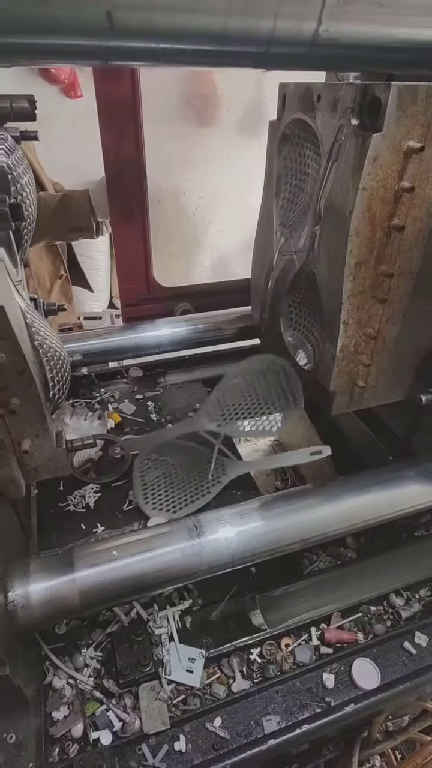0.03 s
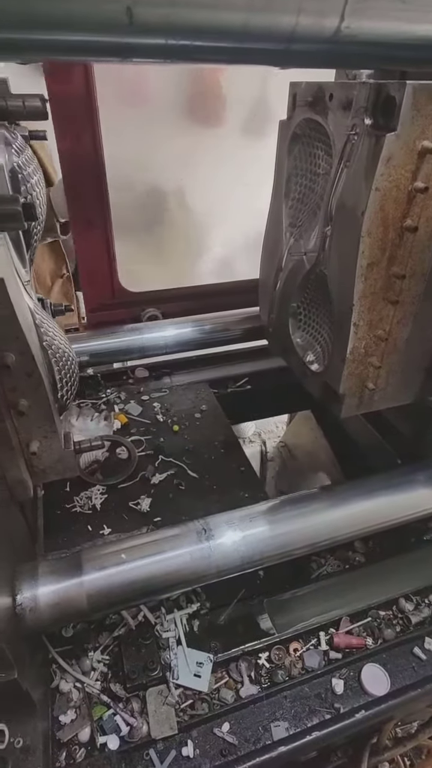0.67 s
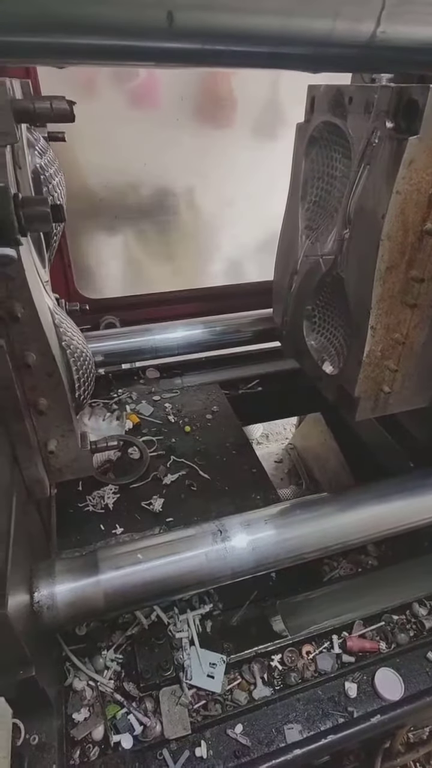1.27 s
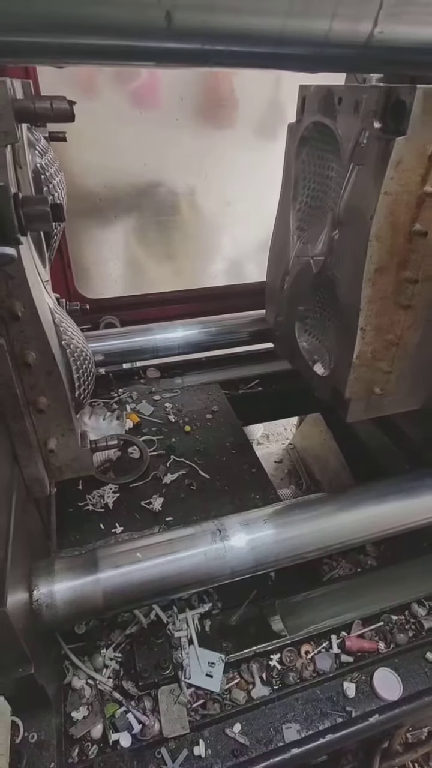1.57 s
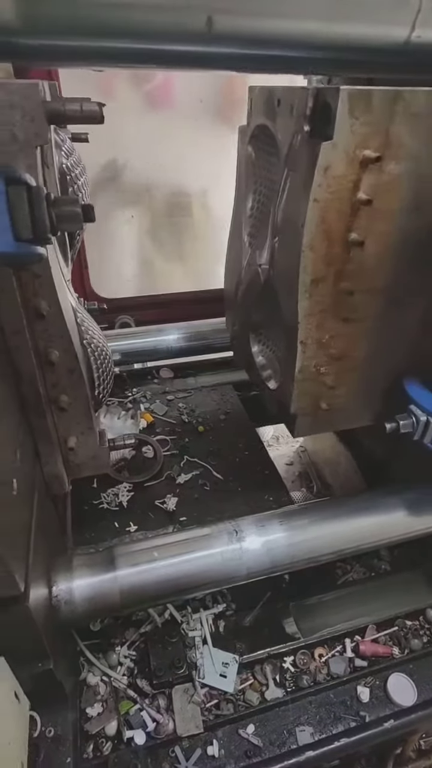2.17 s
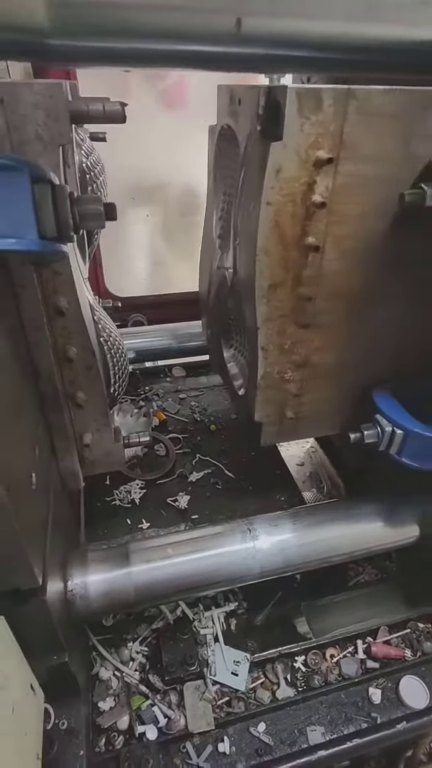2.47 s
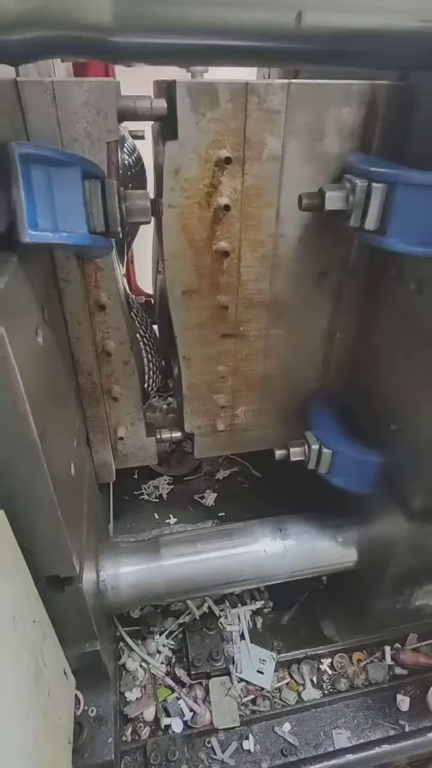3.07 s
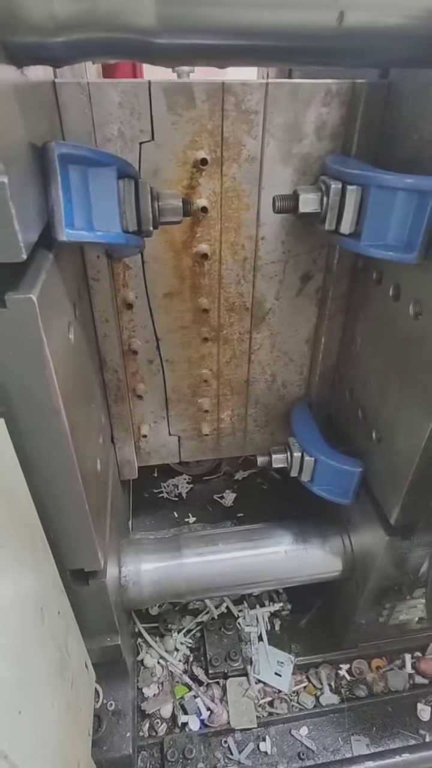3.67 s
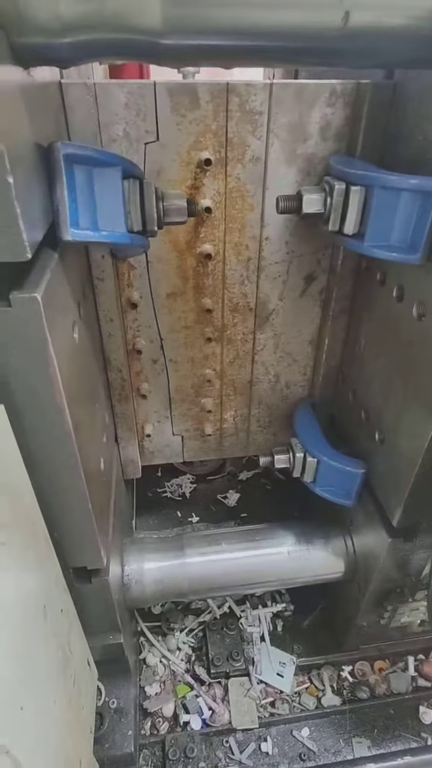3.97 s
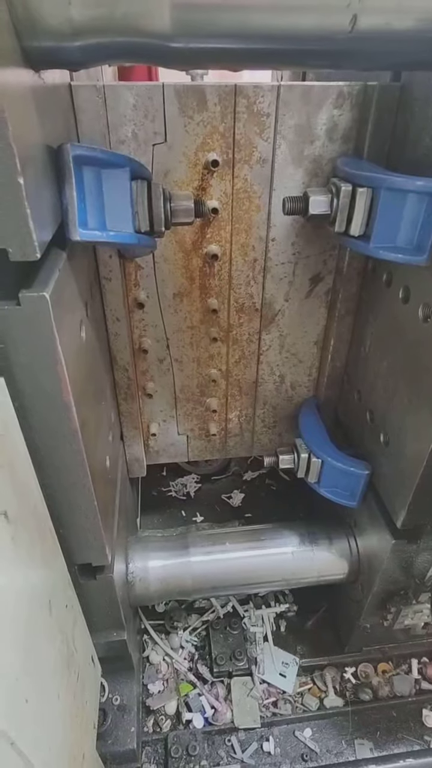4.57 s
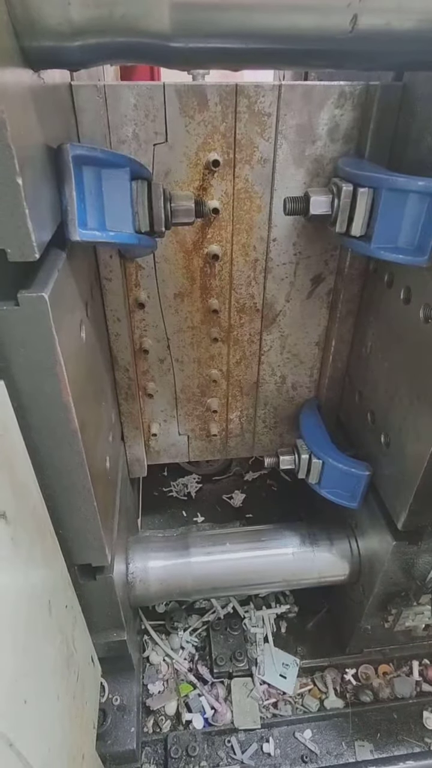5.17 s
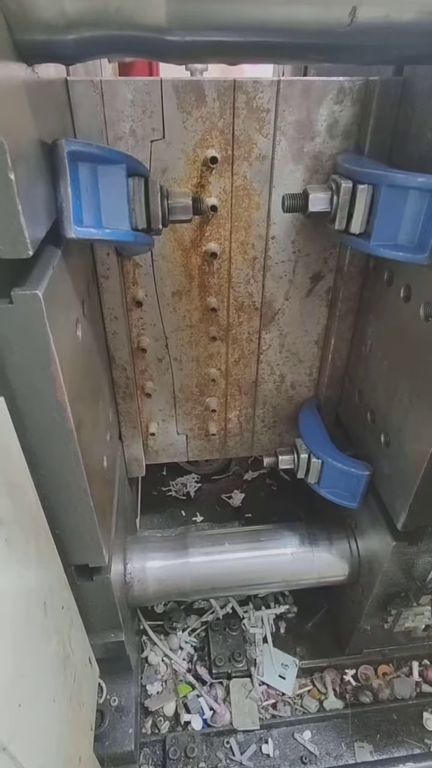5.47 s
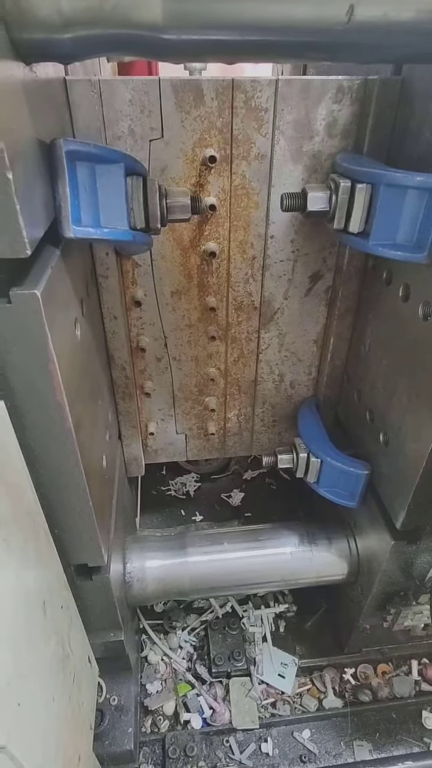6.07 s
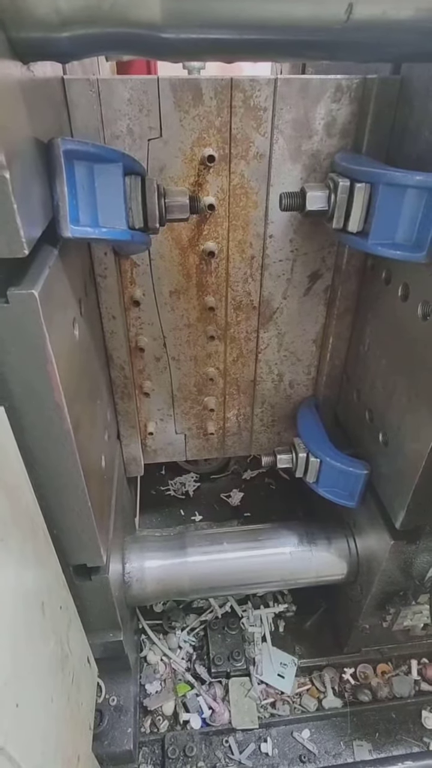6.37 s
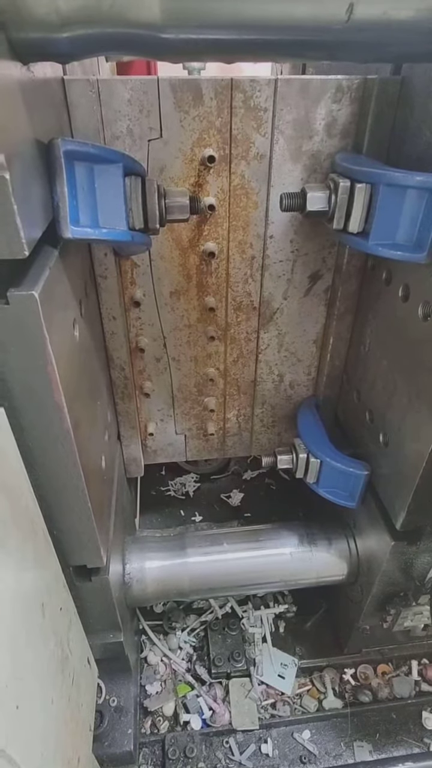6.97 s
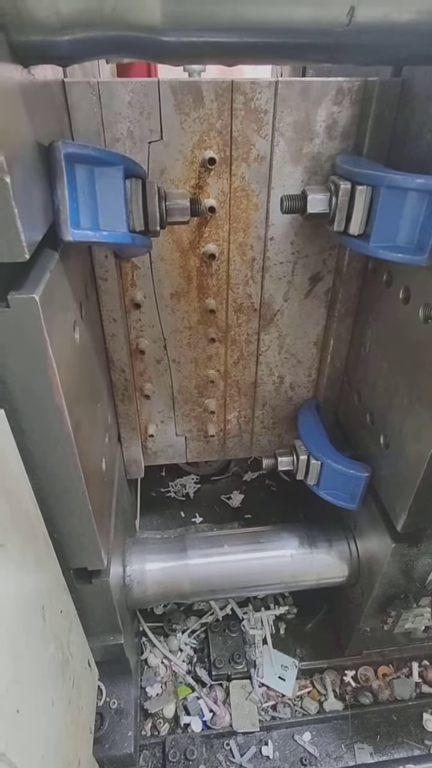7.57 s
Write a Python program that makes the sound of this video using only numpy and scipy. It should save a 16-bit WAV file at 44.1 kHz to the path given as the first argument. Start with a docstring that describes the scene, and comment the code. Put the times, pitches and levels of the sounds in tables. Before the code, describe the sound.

For the first 1.6 seconds, plastic parts clatter down the steel chute of an injection moulding machine in quick, uneven, ringing knocks, with low bumps as the ejector rocks the machine. From about 1.7 seconds a hydraulic pump hums under load, oil rushes and the steel mould scrapes softly as it slides shut. Small jolts and short hisses come between 3.3 and 3.9 seconds, then the mould locks with a heavy metallic clunk at 4.3 seconds. The pump briefly eases, and at 5 seconds a valve spits sharply with a thud. The pump returns higher, drops to a steady buzzing drone over rushing oil, and sinks in pitch from about 7 seconds to the end near 8. Short gritty scrapes come between 5.7 and 7.3 seconds. Throughout, heard from beside the mould, the motor drive whines thinly and other machines hum in the factory hall.

```python
"""One cycle of an injection moulding machine in a factory. First, ejected plastic parts clatter down
the steel chute and the ejector rocks the frame. The hydraulic pump takes up load as the mould scrapes
shut, then locks with a heavy clunk at 4.3 s. A valve spits sharply at 5 s, and the pump's pistons
drone through the injection over rushing oil, slowing as the mould fills. All the while the motor
drive whines thinly and other machines hum in the hall."""
import sys
import numpy as np
from scipy import signal
from scipy.fft import rfft, irfft, next_fast_len
from scipy.io import wavfile
from scipy.ndimage import uniform_filter1d, minimum_filter1d, map_coordinates

SR = 44100
rng = np.random.default_rng(int(sys.argv[2]) if len(sys.argv) > 2 else 0)


def output_pcm(signal):
    """Save a mono or channel-first signal as 16-bit PCM at the path in sys.argv[1].

    Samples are clipped to [-1, 1] before scaling.
    """
    pcm = np.clip(np.atleast_2d(signal).T, -1, 1) * 32767
    wavfile.write(sys.argv[1], SR, np.round(pcm).astype(np.int16))


N = 344421

# Hits on the chute: (time [s], level [dB], hardness [dB/octave], thud [dB], ring length [factor],
# body modes [dB], low note [Hz], low note level [dB], high note [Hz], high note level [dB])
CHUTE_HITS = [(.003, -27.5, 0, -25, 0.52, 5, 436, -16, 1110, -29),
              (.019, -27, 1.5, -24, 0.69, -24, 360, -32, 2380, -21.5),
              (.054, -38, -4, -20.5, 0.8, -15, 242, -15.5, 613, -24),
              (.160, -32, 1, -45, 0.5, -20, 654, -24, 1970, -20),
              (.167, -27.5, -0.5, -42, 0.74, 7, 321, -17, 823, -21),
              (.19, -26, 0, -50, 1.21, 8.5, 620, -25, 2317, -24),
              (.248, -44, 4, -55, .4, -20, 820, -33, 4000, -33),
              (.376, -33.5, -1.5, -38, 0.64, -4, 720.5, -18, 1245, -17),
              (.395, -38, -0.5, -40, 1.83, -15, 722, -20, 1296, -24),
              (.528, -28, 4, -25.5, 0.57, -5, 1215, -21, 2380, -26),
              (.55, -35.5, -1.5, -32, 1.07, -8, 544, -23.5, 2525, -29),
              (.773, -30, -2, -31.5, 0.65, -10, 350, -15.5, 2070, -22),
              (.907, -32.5, 0.5, -27.5, 1.02, -2, 378, -20, 1050, -35),
              (.959, -28.5, 3, -49, 0.75, -13, 338, -15, 1853, -15),
              (.977, -33, 1, -42, 1.5, -3, 1780, -23, 2280, -19.5),
              (1.042, -42, -2, -34, 0.36, -2, 358, -10, 2230, -29),
              (1.07, -34, 4, -29, 0.62, -10, 1000, -22, 2300, -32),
              (1.099, -26, 1.5, -23, 0.62, -22, 367, -16, 2320, -26),
              (1.137, -36.5, -5.5, -25, 0.94, -4, 204, -18.5, 694, -27),
              (1.184, -25, -0.5, -26, 0.98, 1, 2044, -20, 3650, -22),
              (1.241, -35.5, 1.5, -45, .45, -17, 344, -10, 1990, -18),
              (1.252, -25, -1.5, -37, 1.13, 9, 331, -14.5, 834, -20),
              (1.284, -27.5, 1, -49, 1.09, 4.5, 973, -22, 3100, -23),
              (1.311, -35, 5.5, -23.5, 0.69, -1, 327, -17, 6600, -30),
              (1.408, -30.5, -1, -29, 1.25, -13, 790, -30, 1850, -31),
              (1.456, -31, -1.5, -22.5, 1.3, -4.5, 720, -21, 1256, -19),
              (1.573, -37, -2.5, -25, 1.32, -18, 514, -26, 2924, -28.5)]
# The chute's steel ring: (frequency [Hz], level [dB], t60 [s])
CHUTE_MODES = [(316.2, 6, 0.34), (416, -17, 0.52), (622, -6.5, 0.18), (750, -21, 0.4), (809, -6, 0.53),
               (957, -8.5, 0.47), (1310, -12, 0.22), (1910, -15, 0.11), (2060, -25, 0.49),
               (2310, -21, 0.37), (3090, -14, 0.22), (3700, -28, 0.3), (4640, -19, 0.24)]
# Dense vibration between those modes: (frequency [Hz], noise density [dB])
CHUTE_WASH = [(60, -9), (250, -7.5), (330, 0), (600, -5.5), (1300, -11), (1500, -19.5), (1900, -12.5),
              (2350, -13.5), (2700, -19), (3700, -22.5), (5200, -29), (7500, -25.5), (9000, -42),
              (12000, -39)]
# EQ of an average hit, above the thud: (body [dB], ring [dB], clack [dB], crack [dB])
CHUTE_EQ = [7, 3.5, 3, -6.5]


def chute():
    """Plastic parts and the ejector knock on the steel chute."""
    return amp(-4.0) * blows(CHUTE_HITS, CHUTE_MODES, CHUTE_WASH, CHUTE_EQ, ripple_db=8, focus_db=6,
                             wash_db=5.5, wash_t60=0.62, snap_db=3.5, snap_t60=0.068,
                             overtone_db=-9.5, low_t60=0.3, high_t60=0.24)


# Jolts as the clamp sets off, meets and locks: (time [s], level [dB], hardness [dB/octave], thud [dB],
# ring length [factor], body modes [dB], low note [Hz], its level [dB], high note [Hz], its level [dB])
CLAMP_HITS = [(3.328, -49, 2, -28, 0.66, -14, 121, -22, 305, -35),
              (3.535, -45, 0.5, -40, 0.8, 0, 653, -28, 747, -30.5),
              (3.881, -35, -0.5, -23, 0.69, -2, 312, -20.5, 1824, -29.5),
              (4.335, -28.5, -4, -39, 0.98, -4, 389.4, -6.5, 1995, -40),
              (4.371, -30.5, 0.5, -44, 1.0, 3, 336, -16, 452, -30),
              (4.409, -39, -1.5, -28.5, 0.64, -2, 225, -32, 470, -19),
              (4.478, -57, 3, -28, 0.9, -12, 73, -22, 380, -38),
              (4.801, -43, 4.5, -32, 0.95, 1, 194.7, -20.5, 304, -32.5),
              (5.009, -34.5, 2, -25, 1.09, -4, 92.5, -24, 192, -34)]
# The clamp's ring: (frequency [Hz], level [dB], t60 [s])
CLAMP_MODES = [(225, -2.5, 0.68), (311, -12, 0.55), (366, -1, 0.22), (399, -11, 0.32), (447, -4, 0.31),
               (604, -14, 0.36), (798, -9, 0.4), (1030, -29, 0.41), (1373, -20, 0.9), (1830, -12, 0.6),
               (1981, -2.5, 0.91), (2223, -4.5, 0.49)]
# Dark vibration between those modes: (frequency [Hz], noise density [dB])
CLAMP_WASH = [(40, 7.5), (85, 1.5), (150, -6.5), (230, -3), (460, -3), (560, -9.5), (1500, -26.5),
              (2000, -10), (2900, -22.5), (12000, -61)]
# EQ of an average jolt, above the thud: (body [dB], ring [dB], clack [dB], crack [dB])
CLAMP_EQ = [7.5, 1.5, -13.5, -11]


def clamp():
    """The heavy platens meet, lock and shudder as they take up the load."""
    shudder = amp(2 * wobble(85))
    clunks = blows(CLAMP_HITS, CLAMP_MODES, CLAMP_WASH, CLAMP_EQ, ripple_db=3, focus_db=2.5,
                   wash_db=6.0, wash_t60=0.67, snap_db=2, snap_t60=0.11,
                   overtone_db=-30, low_t60=0.23, high_t60=0.26)
    return amp(-2.0) * shudder * clunks


# A hit's thud, body, ring, clack and crack bands: (low edge [Hz], high edge [Hz])
HIT_BANDS = [(65, 200), (200, 650), (650, 1500), (1500, 3000), (3000, 14000)]


def blows(hits, modes, wash, eq_db, ripple_db, focus_db, wash_db, wash_t60, snap_db, snap_t60,
          overtone_db, low_t60, high_t60):
    """Each blow rings a body: hard contact is brighter, weight adds thud, the striker adds two notes."""
    out = np.zeros(N + SR)
    t = np.arange(SR * 3 // 4) / SR
    filters = [signal.butter(3, band, "bandpass", fs=SR, output="sos") for band in HIT_BANDS]
    low_edge, high_edge = np.transpose(HIT_BANDS[1:])
    octaves = np.log2(np.sqrt(low_edge * high_edge) / 1300)  # hardness tilts the EQ about 1300 Hz
    mode_hz, mode_db, mode_t60 = np.transpose(modes)[:, :, None]
    for start, db, hardness, thud_db, length, ring_db, low_hz, low_db, high_hz, high_db in hits:
        hit = out[round(start * SR):][:len(t)]
        age = t / length
        # the striker's hollow notes: the high one is a beating cluster under weak overtones
        notes = [(low_hz, low_db, low_t60)]
        notes += [(high_hz * (1 + detune), high_db - 6, high_t60) for detune in rng.normal(0, 0.0172, 3)]
        notes += [(high_hz * ratio, high_db + overtone_db - 9 * np.log2(ratio), high_t60 / np.sqrt(ratio))
                  for ratio in rng.uniform(1, 2.1, 4)]
        for hz, note_db, t60 in notes:
            envelope = amp(note_db - 60 * age / t60) * (1 - np.exp(-t / 0.00037))
            hit += envelope * np.sin(2 * np.pi * hz * t)
        shifted_hz = mode_hz * (1 + rng.normal(0, 0.0047, mode_hz.shape))  # load detunes the body
        decay = amp(ring_db + mode_db + rng.normal(0, 3.3, mode_hz.shape) - 60 * age / mode_t60)
        ring = decay * np.sin(2 * np.pi * (shifted_hz * t + rng.random(mode_hz.shape)))
        # a short contact, then vibration that builds up inside the guard and dies away
        snap = amp(snap_db - 60 * t / snap_t60) / length ** 2  # dead blows are mostly contact
        bloom = amp(wash_db - 60 * age / wash_t60) * (1 - np.exp(-age / .005))
        texture = contact_noise(wash, len(t), ripple_db, high_hz, focus_db)
        body = (ring.sum(0) + (snap + bloom) * texture) * (1 - np.exp(-t / 0.00014))
        above_thud_db = db + np.array(eq_db) + hardness * octaves
        for sos, band_db in zip(filters, [thud_db, *above_thud_db]):
            band = signal.sosfilt(sos, body)
            hit += amp(band_db) * band / np.std(band[:SR // 20])  # the first 50 ms set the level
    return out[:N]


def contact_noise(spectrum, size, ripple_db, focus_hz, focus_db):
    """Each point of contact favours its own narrow resonances, most of all around one note."""
    hz = np.fft.rfftfreq(size, 1 / SR)
    ripple = map_coordinates(rng.standard_normal(256), [16 * np.log2(1 + hz / 400)])
    focus = np.exp(-(np.log2((hz + 1) / focus_hz) / 0.12) ** 2)  # a bell, 0.12 octave to each side
    peaks = amp(ripple_db * np.tanh(ripple) + focus_db * focus)
    return unit(irfft(rfft(noise(spectrum, size)) * peaks, size))


# The pump's pitch, which frame and drive also follow: (time [s], piston rate [Hz])
PUMP_SPEED = [(1.9, 140.5), (2.2, 138.3), (3.7, 139), (4.0, 131.8), (4.12, 133.6), (4.25, 149.3),
              (5.0, 201.5), (5.2, 185.4), (5.37, 184.2), (5.46, 158.4), (5.55, 151.8), (5.8, 148.9),
              (6.3, 148.2), (6.7, 147.5), (6.85, 145.6), (7.0, 141), (7.15, 136.5), (7.3, 129.7),
              (7.6, 112.5)]
# Its effort through closing, locking, a pause and injection: (time [s], level re full load [dB])
PUMP_LOAD = [(1.0, -11), (1.75, -3), (2.5, -4.5), (3.6, -4), (4.25, 0), (4.6, -16), (4.95, -18), (5.15, -2),
             (5.7, -0.5), (6.9, 0.5), (7.2, 0.5), (7.81, -7.5)]
# The frame's response to the strokes, a notch between two resonances: (frequency [Hz], gain [dB])
FRAME_RESPONSE = [(112, -7), (128, 0.5), (135, -11), (138, -12), (148, -3.5), (156, -0.5), (168, -16),
                  (200, 0)]
# Pipe resonances that the overtones sweep through: (frequency [Hz], gain [dB])
PIPE_RESPONSE = [(280, -1.5), (435, 4.5), (535, 0), (595, 6), (700, 3), (745, 2), (830, 5.5), (900, 3),
                 (1040, -0.5), (1110, 3.5), (1190, -6.5), (1340, -5.5), (1600, -9), (2100, -13)]
# Fader ride of the oil through the valves: (time [s], flow level [dB])
OIL_FLOW = [(1.9, -46), (2.62, -43.5), (2.98, -38.5), (3.33, -43.5), (4.3, -40), (4.5, -45), (4.81, -43),
            (5.09, -43.5), (5.27, -38), (5.68, -38.5), (5.95, -43), (6.74, -41.5), (7.1, -39), (7.38, -41),
            (7.81, -42)]
# The oil's midrange rush: (frequency [Hz], noise density [dB])
OIL_RUSH = [(250, -12), (450, 3), (650, 0.5), (950, 1.5), (1200, -4), (1500, -10.5), (2300, -6.5),
            (3000, -19.5), (5000, -83)]
# The hiss on top of it: (frequency [Hz], noise density [dB])
OIL_HISS = [(1500, -32), (3000, 5), (5000, -1), (6700, 4), (8000, 2.5), (8600, -25.5), (11500, -5.5),
            (12500, -18)]


def pump():
    """Piston strokes throb in the frame and buzz in the pipes with the load; oil rushes in surges."""
    speed_hz, load_db, flow_db = curve(PUMP_SPEED), curve(PUMP_LOAD), curve(OIL_FLOW)
    working_hz, usual_flow_db = 145.6, -42.5
    stroke = phase(speed_hz * (1 + 0.00288 * wobble(18)))
    gliding = np.tanh(np.abs(np.gradient(speed_hz)) * SR / 21)  # 21 Hz/s is a brisk glide
    stumble_rad = 0.053 + 0.2 * gliding  # the strokes stumble while the speed changes
    throb_db = -29.5 + along(FRAME_RESPONSE, speed_hz) + 1.4 * wobble(7.7)
    throb = amp(throb_db) * unit(np.sin(stroke + 2.7 * stumble_rad * wobble(40)))
    buzz = np.zeros(N)
    for k in range(2, 15):
        overtone_db = along(PIPE_RESPONSE, k * speed_hz) + 1.5 * wobble(7)
        flutter_db = 3.5 * wobble(60)
        angle = k * (stroke + .5 * stumble_rad * wobble(40)) + 2 * np.pi * rng.random()
        buzz += amp(overtone_db + flutter_db) * np.sin(angle)
    # more oil brings more buzz; it fades below the working speed
    buzz_db = -38 + .5 * (flow_db - usual_flow_db) + 7.5 * np.minimum(np.log2(speed_hz / working_hz), 0)
    surge = wobble(16)
    rush = amp(1.5 + 1.3 * surge) * noise(OIL_RUSH)
    hiss = amp(-14.5 + .5 * surge + 1.6 * wobble(70)) * noise(OIL_HISS)
    return amp(load_db) * (throb + amp(buzz_db) * unit(buzz)) + amp(flow_db) * (rush + hiss)


# Valve cues: (peak time [s], level [dB], rise [s], t60 [s])
VALVE_SPITS = [(3.519, -44, 0.16, 0.57), (3.671, -36, 0.02, 0.11), (4.315, -40, 0.072, 0.14),
               (5.025, -26.5, 0.0014, 0.085), (5.06, -46, 0.022, 0.29), (5.29, -43.5, .02, 0.13)]
# Their bright spray: (frequency [Hz], noise density [dB])
VALVE_SPRAY = [(880, -38), (1500, -13), (2120, 5), (3140, -4.5), (6940, -6.5), (8250, -8.5), (9160, -17),
               (12000, -19)]


def valves():
    """Valves open with a short spit of hiss."""
    return swells(VALVE_SPITS) * noise(VALVE_SPRAY)


# Scrapes of sliding steel: (peak time [s], level [dB], rise [s], t60 [s])
SLIDE_SCRAPES = [(1.6, -46, 0.029, 1.4), (2.82, -47, 0.32, 4), (5.66, -42, 0.26, 1.67),
                 (6.28, -41.5, 0.095, 0.41), (6.93, -43, 0.091, 0.62), (7.32, -37.5, 0.12, 0.65)]
# Their gritty rasp: (frequency [Hz], noise density [dB])
SLIDE_GRIT = [(700, -42), (1700, 4), (2200, 1.5), (3000, -5), (4300, -16.5), (6000, -22.5), (12000, -78)]


def slides():
    """Sliding steel catches on grit in quick uneven bursts."""
    return swells(SLIDE_SCRAPES) * unit(amp(2.0 * wobble(170)) * noise(SLIDE_GRIT))


# Low-end bumps from the ejector's strokes: (peak time [s], level [dB])
EJECTOR_ROCKS = [(.11, -24), (.5, -25.5), (.65, -26.5), (1.03, -31), (1.19, -23), (1.56, -26)]


def frame():
    """The frame shakes at one low note: with pump load, more as the pump slows, and at ejector strokes."""
    braking_hz_per_s = np.maximum(-np.gradient(curve(PUMP_SPEED)) * SR, 0)
    braking = uniform_filter1d(np.tanh(braking_hz_per_s / 67), int(0.4 * SR))  # the frame follows slowly
    running = amp(-41 + 0.65 * curve(PUMP_LOAD) + 14.5 * braking + 2.3 * wobble(11))
    rise, t60 = 0.082, 0.29
    rocking = swells([(peak, db, rise, t60) for peak, db in EJECTOR_ROCKS])
    note_hz = 48.3 + 2.82 * wobble(13)
    return (running + rocking) * unit(np.sin(phase(note_hz)))


# Fader ride of the motor drive's thin whine: (time [s], level [dB])
DRIVE_WHINE = [(0.0, -52), (0.41, -58), (1.07, -49), (1.65, -64.5), (2.72, -57), (3.39, -61.5), (3.67, -51),
               (3.76, -69), (4.18, -61), (4.98, -88), (5.02, -56), (5.07, -58), (7.81, -59.5)]


def drive():
    """The inverter's 8 kHz switching tone, with sidebands that follow the motor speed."""
    carrier = np.sin(phase(np.full(N, 8000)))
    field = phase(curve(PUMP_SPEED) * 2 / 3)
    whine = carrier * (1 + 0.5 * np.cos(field) + 0.17 * np.cos(2 * field))
    return amp(curve(DRIVE_WHINE) + 2.0 * wobble(22)) * unit(whine)


# Hum of nearby machines: (frequency [Hz], level [dB], speed lost under load [fraction])
NEARBY_MOTORS = [(251.2, -49, 0.0025), (285.2, -45.5, .01), (371, -48.5, .02), (1300, -55, .022)]
# The ramp on which their load comes on: (start [s], end [s])
LOAD_RAMP = [4.8, 6.2]
# The hall's room tone: (frequency [Hz], noise density [dB])
ROOM_TONE = [(22, 2.5), (48, 2.5), (250, -2), (300, -3), (400, -10.5), (600, -19.5), (830, -33),
             (1400, -20), (1900, -15), (2500, -22), (3800, -35), (8000, -43.5), (12000, -100)]


def factory():
    """Other machines hum through the hall, sagging a little in pitch as they take up load."""
    loaded = np.interp(np.arange(N) / SR, LOAD_RAMP, [0, 1])
    hum = np.zeros(N)
    for hz, db, sag in NEARBY_MOTORS:
        level = amp(db + 1.2 * wobble(11))
        pitch_hz = hz * (1 - sag * loaded) + 1.68 * wobble(10)
        hum += level * unit(np.sin(phase(pitch_hz)))
    return hum + amp(-37.5) * noise(ROOM_TONE)


def amp(db):
    """Decibels to gain."""
    return 10 ** (np.asarray(db) / 20)


def unit(x):
    """Scale to rms 1."""
    return x / np.sqrt(np.mean(x ** 2) + 1e-20)


def along(points, hz):
    """Read an EQ curve on a log frequency axis."""
    point_hz, db = np.transpose(points)
    return np.interp(np.log(hz + 1), np.log(point_hz + 1), db)


def curve(points):
    """An automation lane: (time, value) points to one value per sample."""
    return np.interp(np.arange(N) / SR, *np.transpose(points))


def swells(rows):
    """An envelope: each row climbs 20 dB per rise time to its peak, then dies away."""
    t = np.arange(N) / SR
    return sum(amp(db - 60 * np.maximum(t - peak, 0) / t60 - 20 * np.maximum(peak - t, 0) / rise)
               for peak, db, rise, t60 in rows)


def wobble(rate):
    """A smooth random curve, rate knots a second."""
    return map_coordinates(rng.standard_normal(int(N * rate / SR) + 4), [np.arange(N) * rate / SR])


def noise(spectrum, size=N):
    """Coloured noise of rms 1."""
    padded = next_fast_len(size)
    colour = amp(along(spectrum, np.fft.rfftfreq(padded, 1 / SR)))
    return unit(irfft(rfft(rng.standard_normal(padded)) * colour, padded)[:size])


def phase(hz):
    """The running angle of a changing frequency."""
    return 2 * np.pi * np.cumsum(hz) / SR


def scene():
    """The mono mix, heard from beside the mould."""
    return (chute() + clamp() + valves() + slides() + pump() + drive() + frame() + factory())[None]


def record(dry):
    """A fast limiter holds down the highest peaks, then a brick-wall filter cuts the top end."""
    ceiling, window, top_hz = .48, int(.004 * SR), 12200
    gain = ceiling / np.maximum(np.abs(dry), ceiling)
    gain = uniform_filter1d(minimum_filter1d(gain, 2 * window), window)
    padded = next_fast_len(N + SR // 2)
    passband = np.fft.rfftfreq(padded, 1 / SR) < top_hz
    return irfft(rfft(dry * gain, padded) * passband, padded)[..., :N]


dry = scene()
out = record(dry)
output_pcm(out)
```